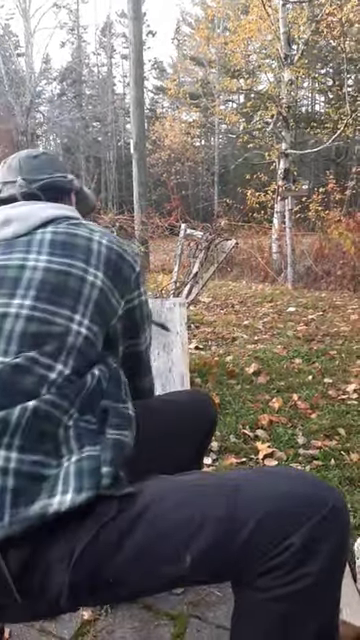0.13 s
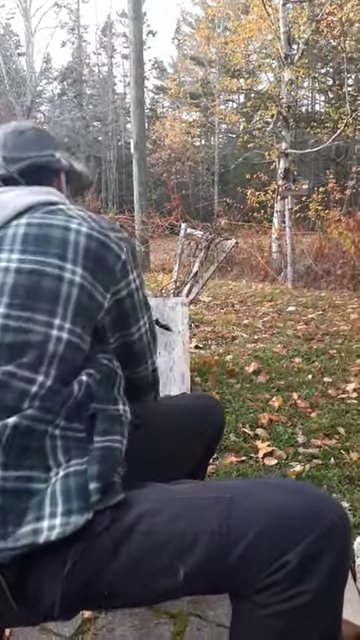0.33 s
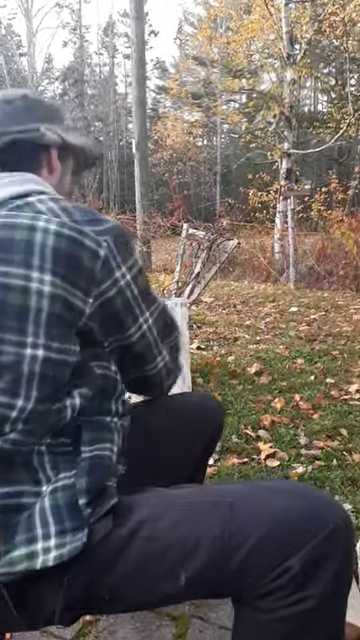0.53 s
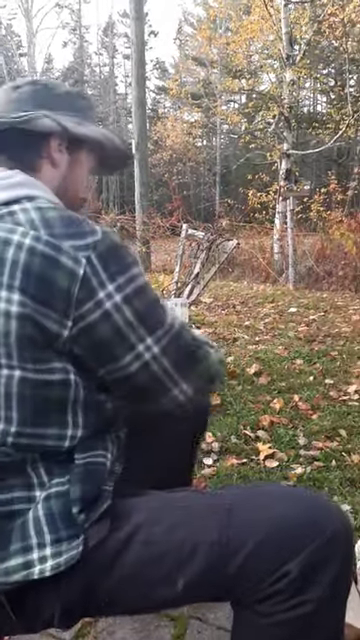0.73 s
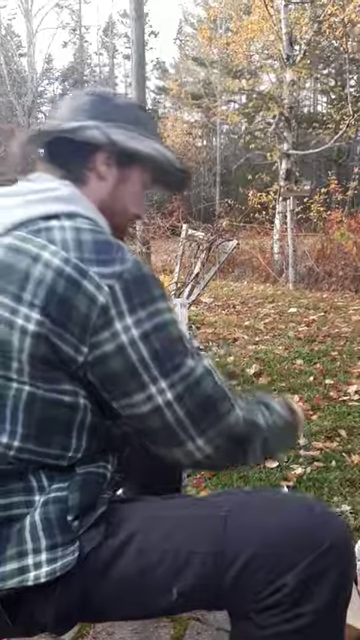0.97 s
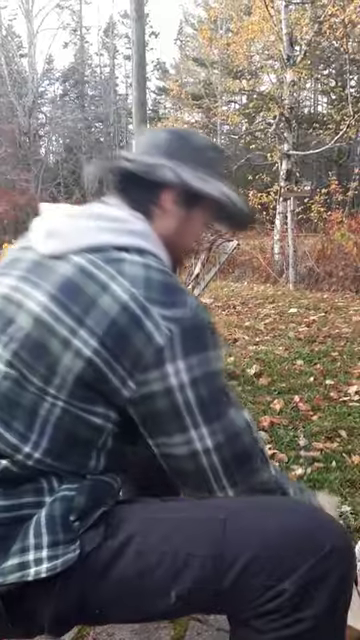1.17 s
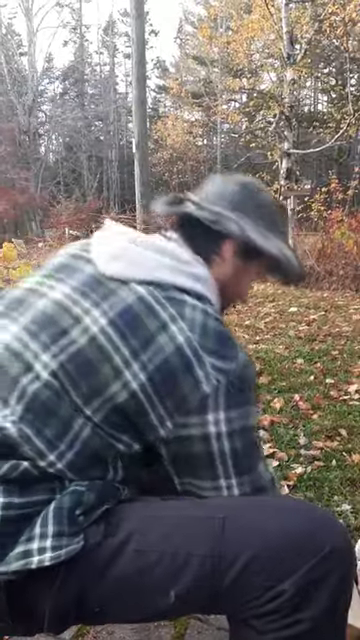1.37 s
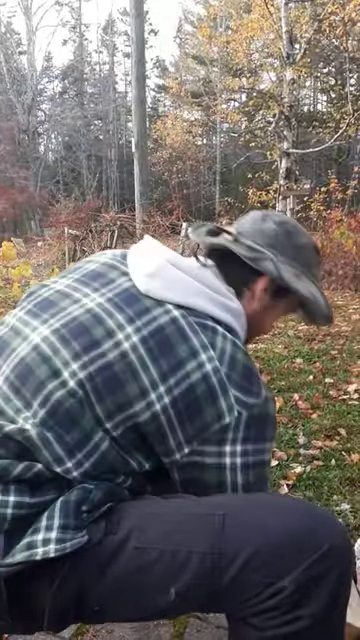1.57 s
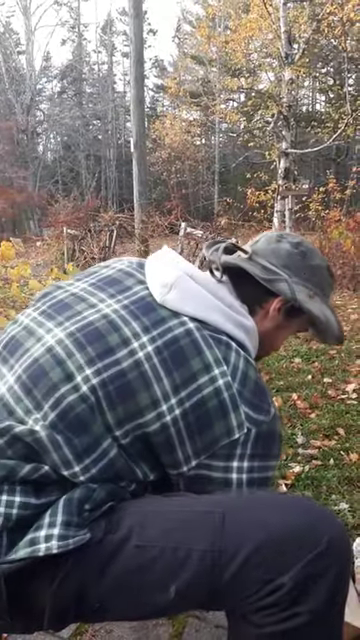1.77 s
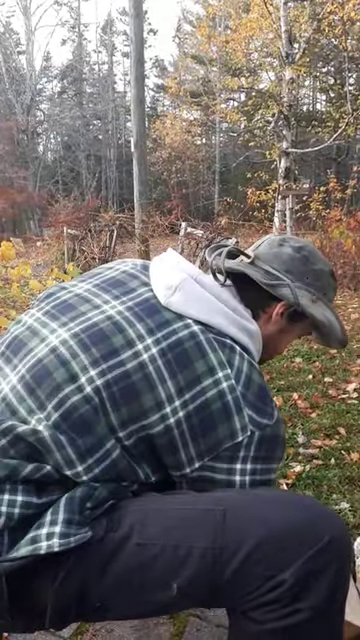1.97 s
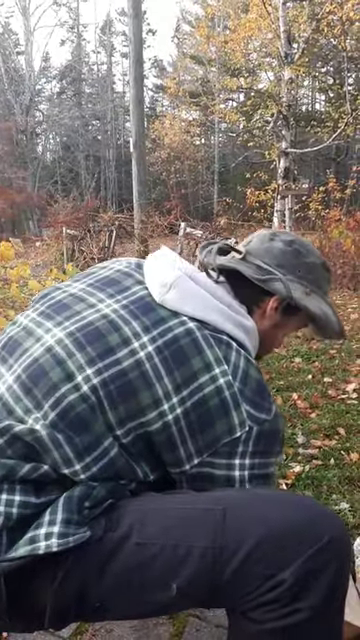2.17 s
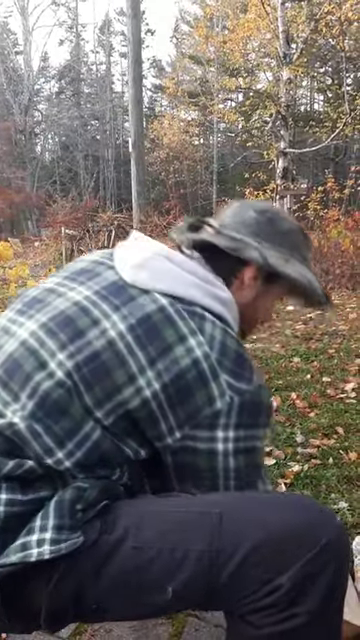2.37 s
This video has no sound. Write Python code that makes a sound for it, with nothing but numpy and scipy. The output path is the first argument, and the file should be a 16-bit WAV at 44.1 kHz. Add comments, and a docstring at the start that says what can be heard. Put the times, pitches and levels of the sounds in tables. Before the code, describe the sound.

A thrown knife thuds sharply into a wooden stump outdoors, then faint clothing rustles.

```python
"""A thrown knife sticks in a wooden stump on a lawn. Over faint rumble, hiss and a far-off rush, the
steel blade rings in flight. At 0.22 s the point cracks into the grain, the blade pings and the stump
thuds. The yard and the edge of the wood scatter the thud back. The seated thrower then leans forward
with small ticks and rustles of clothing."""
import sys
import numpy as np
from scipy import signal
from scipy.fft import rfft, irfft
from scipy.io import wavfile

SR = 44100
rng = np.random.default_rng(int(sys.argv[2]) if len(sys.argv) > 2 else 0)


def inscribe(sig):
    """Save sig as 16-bit PCM at rate SR to the path in sys.argv[1].

    A 1-D sig is mono; a 2-D sig holds one channel per row.
    Samples are clipped to [-1, 1] before scaling.
    """
    pcm = np.round(np.clip(np.atleast_2d(sig).T, -1, 1) * 32767)
    wavfile.write(sys.argv[1], SR, pcm.astype(np.int16))


N = 105840
SHORT_SAMPLES = 8192
TIME_S = np.arange(N) / SR
FREQ_HZ = np.maximum(np.arange(N // 2 + 1) * SR / N, 1)
CRACK_S, THUD_S = .2156, .2171

# Stereo width of all noise. Each row: frequency in Hz, left-right correlation.
STEREO_CORRELATION = [(100, 0.88794), (280, 0.8232), (480, 0.79), (900, 0.643), (2000, 0.0848),
                      (5000, 0.4615), (12000, -0.15)]
# Steady outdoor air. Each row: frequency in Hz, relative level in dB.
AIR_SPECTRUM = [(20, -19.5), (32, -14.5), (50, -3.5), (104, 0), (140, -3.5), (230, -11.5), (313, -9.5),
                (450, -17.5), (1000, -15.5), (1600, -16), (2500, -21.5), (3400, -23), (5100, -21),
                (6550, -13), (7600, -19.5), (9500, -25.5), (11500, -19.5), (15500, -23.5)]
# Far-off rush. Each row: frequency in Hz, relative level in dB.
RUSH_SPECTRUM = [(300, -21.5), (540, -17.5), (700, -1.5), (970, 1), (1200, -6.5), (1500, -14.5),
                 (2300, -36)]
# Swell of the rush. Each row: time in seconds, level in dB.
RUSH_SWELL = [(0, -75.5), (.2, -71), (.45, -64.5), (.65, -67.5), (.9, -65.5), (1.15, -68), (1.35, -63.5),
              (1.6, -67.5), (1.8, -64.5), (2.1, -67.5), (2.4, -71)]
# Blade in flight. Each row: frequency in Hz, level in dB.
FLIGHT_PARTIALS = [(3222, -73.5), (4222, -76.5), (4473, -74), (5612, -77), (5668, -79), (6262, -69.5)]
# Splitting fibres. Each row: frequency in Hz, relative level in dB.
CRACK_SPECTRUM = [(900, -12), (2000, -10), (2800, -10), (3700, -21), (5600, -10), (6800, 1), (8400, -5),
                  (9400, -17.5), (11600, -10.5), (13000, -14.5), (15500, -16)]
# Blade on impact. Each row: frequency in Hz, level in dB, T60 in seconds.
BLADE_MODES = [(2740, -54, .04), (6900, -49, .04), (7400, -56, .03), (8510, -51, .012), (11560, -59.5, .04)]
# Stump with the knife in it. Each row: frequency in Hz, relative level in dB, T60 in seconds,
# left minus right in dB.
STUMP_MODES = [(112, -27.5, .06, -4.5), (154, 8.5, .014, -1.5), (230, 5, .035, -1.5),
               (282.7, -16.5, .08, -1), (462, -9.5, 0.034, -11), (738, -20, 0.04, 6), (920, -8.5, .014, -2),
               (1014, -24, .04, 6), (1194, -12, .014, 0.5), (1215, -57.5, .14, 1.5), (1560, -48, 0.12, 6.5),
               (1841, -19, 0.012, 11.5), (1810, -47, .1, 7), (1956, -28, .014, 3),
               (2400, -29, 0.013766, 0.5)]
# Diffuse yard scatter. Each row: frequency in Hz, relative level in dB.
SCATTER_SPECTRUM = [(30, -30), (55, -21), (115, -27.5), (165, -1), (250, 0), (320, -5), (390, -14.5),
                    (460, -3.5), (620, -29.5), (730, -14), (830, -27.5), (1220, -19), (1550, -33),
                    (2100, -34.5), (3500, -44.5), (8000, -53.5)]
# Lingering bass. Each row: frequency in Hz, relative level in dB.
BOOM_SPECTRUM = [(40, -21.5), (75, -1), (120, -8.5), (170, 0.5), (230, -13.5), (330, -26), (800, -15.5),
                 (1300, -18.5), (2500, -41)]
# Distinct echoes of the thud. Each row: delay in seconds, gain in dB, low-pass corner in Hz.
YARD_ECHOES = [(0.059, -29, 1200), (0.069, -30.5, 1500), (0.0744, -24.5, 700), (.109, -26, 200)]
# Clothing and handling ticks. Each row: start in seconds, level in dB, T60 in seconds, pitch in Hz.
CLOTH_TICKS = [(.371, -52.5, 0.01763, 6385), (.554, -53.5, 0.028, 1643), (0.596, -52.5, 0.014, 4960),
               (.977, -54.5, 0.03827, 1924), (1.0478, -46.5, 0.013, 6400), (1.118, -56, 0.02192, 6500),
               (1.239, -54, 0.02556, 1700), (1.3763, -45, 0.013, 6638), (1.377, -47.5, 0.023, 1478),
               (1.461, -46.5, 0.015, 6805), (1.726, -56, 0.046, 1490), (2.02, -57.5, .03, 1400),
               (2.301, -46.5, 0.017, 6400), (2.315, -49.5, .018, 4300), (2.338, -54.5, 0.01641, 4800),
               (2.349, -52.5, 0.01548, 1941)]
# Base colour of a tick. Each row: frequency in Hz, relative level in dB.
TICK_SPECTRUM = [(20, -75), (150, -45), (400, -21), (800, -9.5), (1300, -2), (2800, -9), (4500, -6),
                 (6800, -3.5), (8500, -9), (12000, -11), (15500, -13)]
# Sleeve and shirt rubs. Each row: centre in seconds, level in dB, half width in seconds,
# tilt in dB per octave.
CLOTH_RUBS = [(0.582, -65.5, 0.041, 3.5), (1.399, -63.5, 0.033, 1), (1.735, -66.5, 0.01525, -7.5),
              (2.036, -60.5, 0.0371, 12), (2.331, -63.5, 0.045, 4)]
# Base colour of a rub. Each row: frequency in Hz, relative level in dB.
RUB_SPECTRUM = [(20, -70), (150, -35), (400, -15), (1000, -19.5), (2000, 4), (3000, -6), (4500, -1.5),
                (6600, -8), (9000, -12.5), (15500, -17)]


def amp(db):
    """Decibels to gain."""
    return 10 ** (np.asarray(db) / 20)


def pan(db):
    """Stereo gains for a left-minus-right level."""
    return amp(np.array([[db], [-db]]) / 2)


def add(out, sound, start_s):
    """Mix a sound in at a start time."""
    part = out[:, round(start_s * SR):][:, :sound.shape[-1]]
    part += sound[..., :part.shape[1]]


def delay(x, delay_s):
    """Circular fractional delay."""
    return irfft(rfft(x) * np.exp(-2j * np.pi * FREQ_HZ * delay_s), N)


def log_interp(points, freq_hz):
    """Interpolate on a log-frequency axis."""
    hz, value = np.array(points).T
    return np.interp(np.log(freq_hz), np.log(hz), value)


def noise(spectrum, tilt_db_oct=0, grain=0, peak_hz=None, size=N):
    """Coloured stereo noise, rms 1, with an optional resonance; grain breaks it into tiny snaps."""
    freq_hz = np.maximum(np.arange(size // 2 + 1) * SR / size, 1)
    snaps = np.exp(grain * np.repeat(rng.standard_normal(size // 20 + 1), 20)[:size])
    mid, side = rfft(rng.standard_normal((2, size)) * snaps)
    correlation = np.clip(log_interp(STEREO_CORRELATION, freq_hz), -1, 1)
    stereo = mid * np.sqrt(1 + correlation) + np.array([[1], [-1]]) * side * np.sqrt(1 - correlation)
    colour_db = log_interp(spectrum, freq_hz) + tilt_db_oct * np.log2(freq_hz)
    if peak_hz:
        peak_db, width_oct = 8, .2
        colour_db += peak_db * np.exp(-(np.log2(freq_hz / peak_hz) / width_oct) ** 2)
    x = irfft(stereo * amp(colour_db), size)
    return x / x.std()


def envelope(start_s, rise_s, t60_s, hold_s=0, size=N):
    """Smooth rise, hold, exponential decay."""
    age_s = np.maximum(TIME_S[:size] - start_s, 0)
    attack = 1 - np.exp(-(age_s / rise_s) ** 2)
    return attack * np.exp(-np.log(1000) * np.maximum(age_s - hold_s, 0) / t60_s)


def mode(hz, db, t60_s, rise_s):
    """One damped resonance."""
    tone = np.sin(2 * np.pi * hz * TIME_S[:SHORT_SAMPLES])
    return amp(db) * envelope(0, rise_s, t60_s, size=SHORT_SAMPLES) * tone


def outdoors():
    """Steady rumble and hiss, with a slowly swelling far-off rush."""
    swell_db = np.interp(TIME_S, *np.array(RUSH_SWELL).T)
    rush = amp(swell_db) * noise(RUSH_SPECTRUM)
    return amp(-61.5) * noise(AIR_SPECTRUM) + pan(db=3.5) * rush


def blade():
    """Steel rings faintly in flight, then pings as the wood grips it."""
    out = np.zeros((2, N))
    flight_s = TIME_S[TIME_S < CRACK_S]
    ring = sum(amp(db) * np.sin(2 * np.pi * hz * flight_s) for hz, db in FLIGHT_PARTIALS)
    add(out, ring * envelope(0, rise_s=.0035, t60_s=1, size=len(flight_s)), 0)
    ping = sum(mode(hz, db, t60_s, rise_s=.0002965) for hz, db, t60_s in BLADE_MODES)
    add(out, pan(db=5.5) * ping, CRACK_S)
    return out


def fibre_crack():
    """The point splits the fibres: bright snap, short splintery tail."""
    snap = envelope(CRACK_S, rise_s=.00035, t60_s=.016, hold_s=.0028) * noise(CRACK_SPECTRUM, grain=.22)
    splinters = noise(CRACK_SPECTRUM, tilt_db_oct=-1.5253, grain=.4347)
    tail = envelope(CRACK_S, rise_s=.0017, t60_s=.11) * splinters
    return amp(-35) * snap + amp(-49.5) * tail


def stump_thud():
    """The blade drives in; damped wood rings briefly and a near surface on the right reflects it."""
    direct_lead_s, reflection_s, reflection_lead_s = .00007, .00673, .00025  # right channel leads
    ring = sum(pan(pan_db) * mode(hz, db, t60_s, rise_s=.0041) for hz, db, t60_s, pan_db in STUMP_MODES)
    radiation = signal.butter(1, 33, "high", fs=SR, output="sos")  # a small stump radiates little bass
    thud = np.zeros((2, N))
    add(thud, amp(.5) * signal.sosfilt(radiation, ring), THUD_S)
    direct = delay(thud, np.array([[0], [-direct_lead_s]]))
    reflection = delay(thud, np.array([[reflection_s], [reflection_s - reflection_lead_s]]))
    return direct + amp(-8.5) * pan(db=-.5) * reflection


def yard(thud):
    """Ground and trees scatter the thud, bass lingering longest; a few dull echoes return from afar."""
    start_s = THUD_S + .008
    scatter = amp(-30.5) * envelope(start_s, rise_s=.004, t60_s=.25) * noise(SCATTER_SPECTRUM)
    boom = amp(-40) * envelope(start_s, rise_s=.012, t60_s=.45) * noise(BOOM_SPECTRUM)
    out = pan(db=-.3) * (scatter + boom)
    for delay_s, db, corner_hz in YARD_ECHOES:
        dulled = irfft(rfft(thud) / (1 + (FREQ_HZ / corner_hz) ** 2), N)
        out += amp(db) * delay(dulled, delay_s)
    return out


def clothing():
    """The thrower moves: sharp ticks, soft grainy rubs."""
    out = np.zeros((2, N))
    for start_s, db, t60_s, pitch_hz in CLOTH_TICKS:
        tilt_db_oct = 2.6 * np.log2(pitch_hz / 5500)  # low ticks are duller
        tick = noise(TICK_SPECTRUM, tilt_db_oct, peak_hz=pitch_hz, size=SHORT_SAMPLES)
        decay = envelope(0, rise_s=.00012, t60_s=t60_s, size=SHORT_SAMPLES)
        add(out, amp(db) * decay * tick, start_s)
    middle_s = SHORT_SAMPLES / SR / 2
    for centre_s, db, half_width_s, tilt_db_oct in CLOTH_RUBS:
        swell = np.exp(-((TIME_S[:SHORT_SAMPLES] - middle_s) / half_width_s) ** 2)
        rub = noise(RUB_SPECTRUM, tilt_db_oct, grain=.596, size=SHORT_SAMPLES)
        add(out, amp(db) * swell * rub, centre_s - middle_s)
    return out


def scene():
    """Background, flight, hit, echoes, thrower."""
    thud = stump_thud()
    return outdoors() + blade() + fibre_crack() + thud + yard(thud) + clothing()


def record(dry):
    """Gentle bass cut, steep cut of the top treble."""
    low_hz, top_hz = 60, 15800
    highpass = signal.butter(2, low_hz, "high", fs=SR, output="sos")
    lowpass = signal.ellip(10, .1, 70, top_hz, fs=SR, output="sos")
    return signal.sosfilt(lowpass, signal.sosfilt(highpass, dry))


dry = scene()
out = record(dry)
inscribe(out)
```